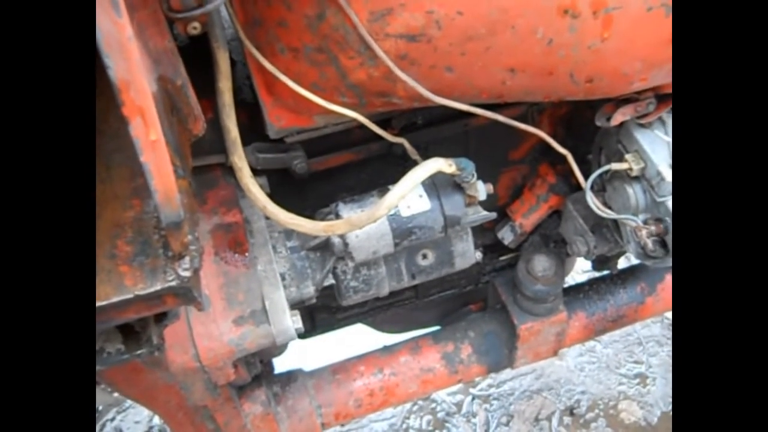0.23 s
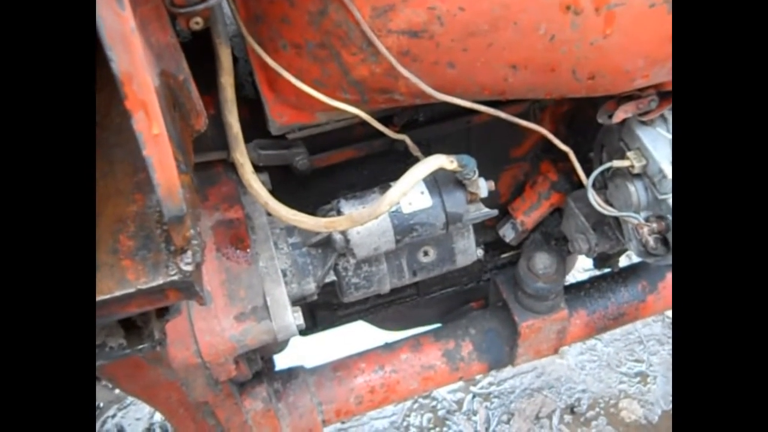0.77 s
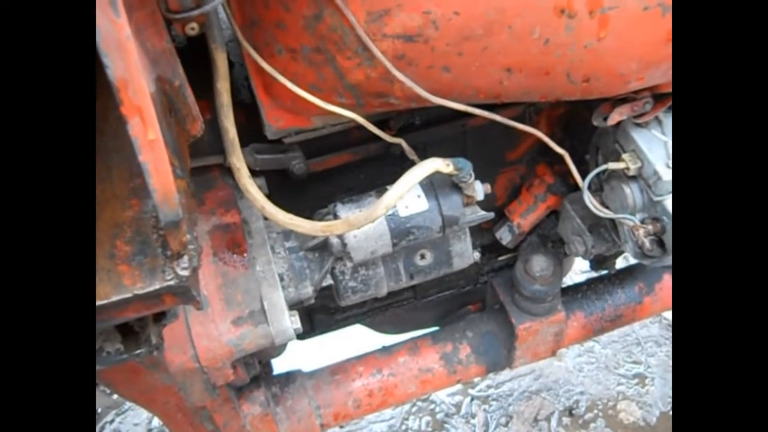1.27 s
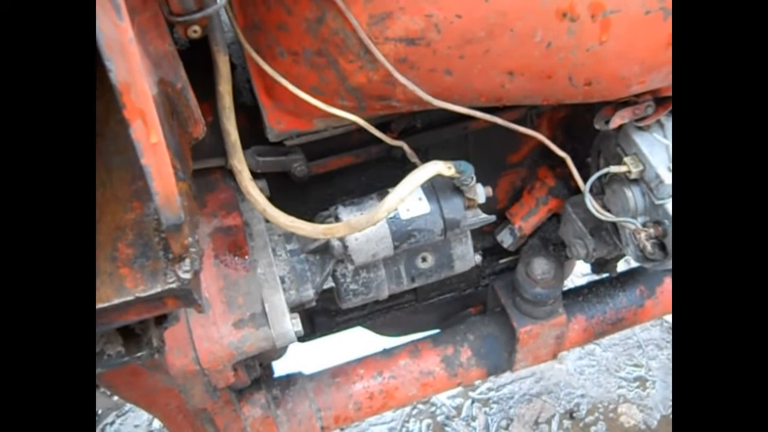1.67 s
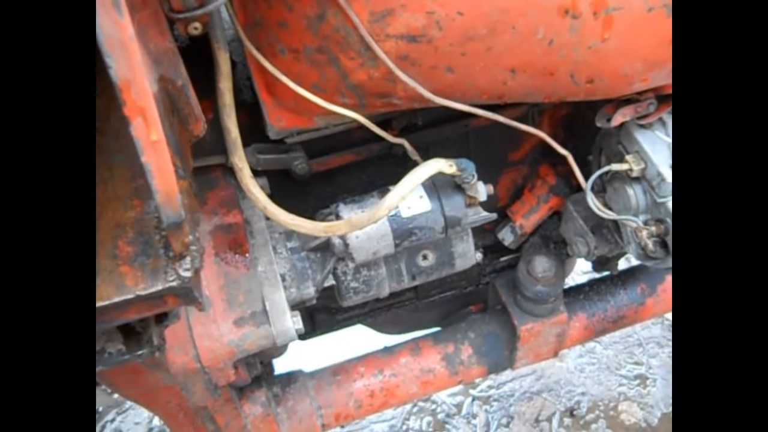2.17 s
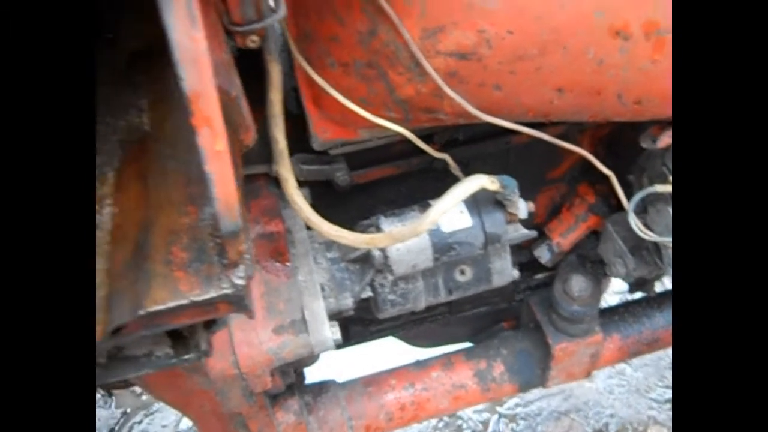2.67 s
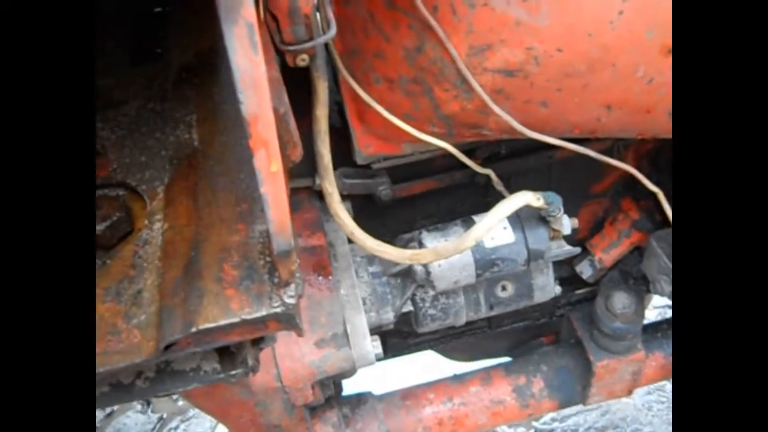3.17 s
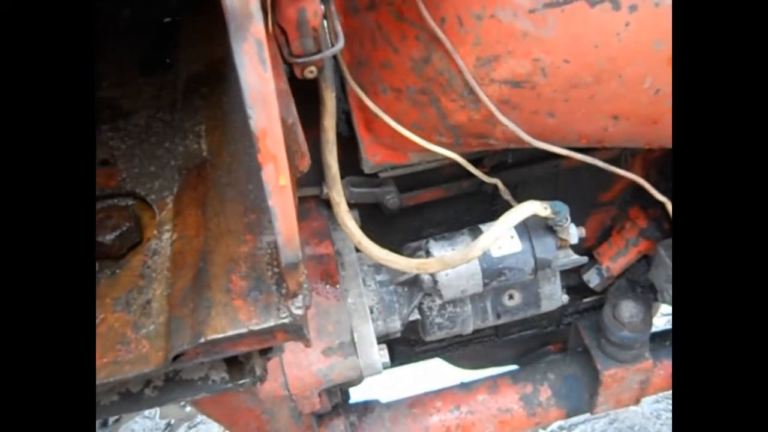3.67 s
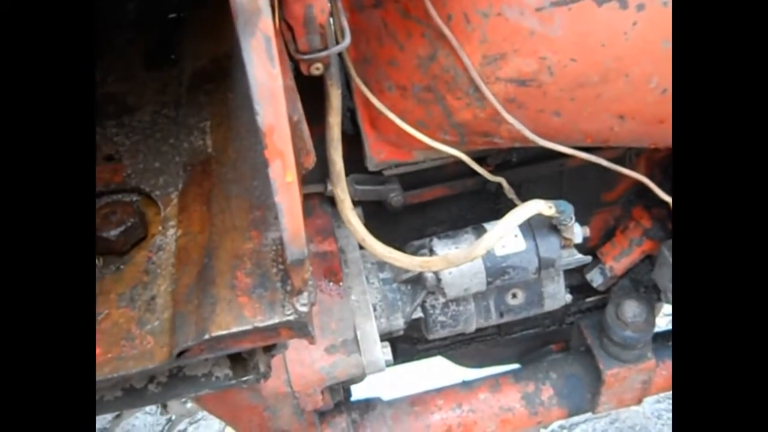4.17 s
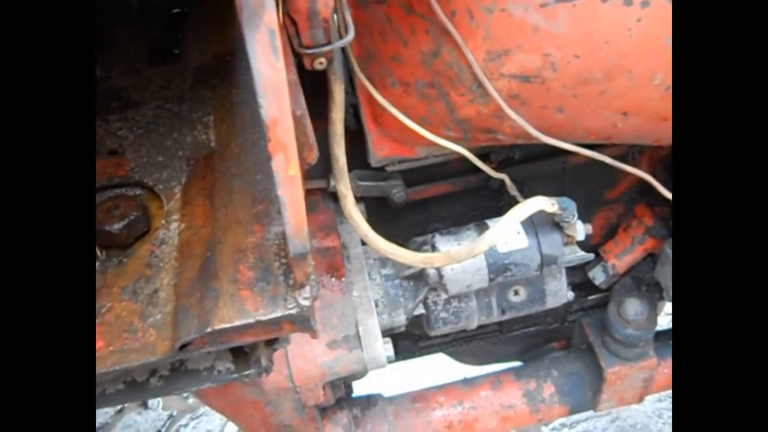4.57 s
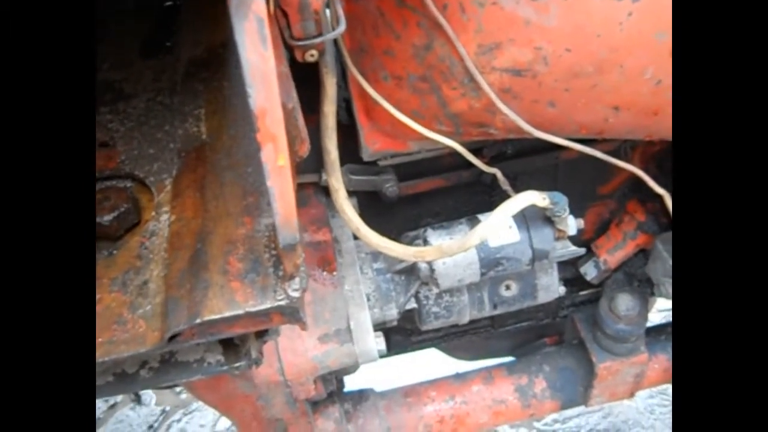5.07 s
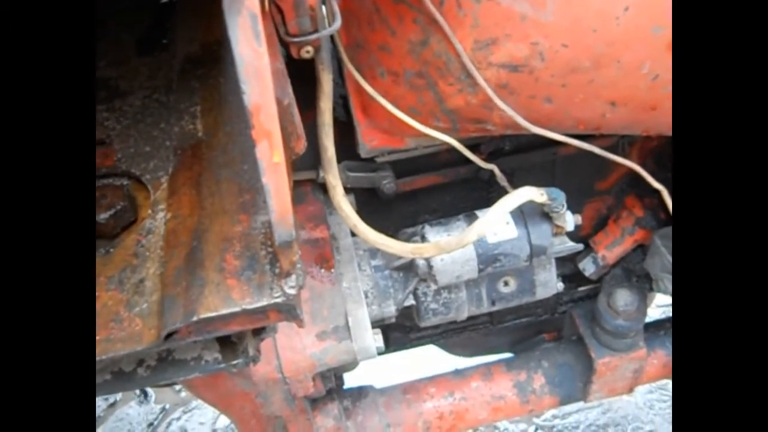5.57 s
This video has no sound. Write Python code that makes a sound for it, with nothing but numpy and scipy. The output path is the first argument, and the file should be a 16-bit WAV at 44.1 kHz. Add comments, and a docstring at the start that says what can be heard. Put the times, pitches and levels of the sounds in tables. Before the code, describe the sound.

Hard metal click-clacks from a tractor starter repeat over quiet outdoor air, growing louder, then low wind buffets hit the microphone.

```python
"""A starter solenoid on a tractor's cast housing pulls in and drops back every second or so, outdoors, near a
small camera. Each stroke is a chain of metal contacts ringing the housing's damped modes; a wall answers as
delayed decaying noise. Shaped noise makes the air hiss, a wandering sine the low early hum, damped tones the soft
knocks on the camera. Wind buffets the microphone as slow noise, thumps and flutter; the loudest peaks clip."""
import sys
import numpy as np
from scipy import signal
from scipy.fft import rfft, irfft, next_fast_len
from scipy.io import wavfile
from scipy.ndimage import map_coordinates

SR = 44100
rng = np.random.default_rng(int(sys.argv[2]) if len(sys.argv) > 2 else 0)


def generate_wav(sig):
    """Save sig (samples, or channels by samples) to the path in sys.argv[1] as 16-bit PCM at SR."""
    pcm = np.round(np.clip(np.atleast_2d(sig).T, -1, 1) * 32767).astype(np.int16)
    wavfile.write(sys.argv[1], SR, pcm)


N = 257103

# Rise and fall of the air hiss, which the steady wind rumble follows: time_s, rms_db
AIR_LEVEL = [(0, -51.5), (.38, -51), (.43, -53.5), (.6, -70), (1.2, -67.5), (1.45, -56.5), (1.86, -50.5),
             (1.9, -58), (2.3, -60.5), (3.6, -62.5), (3.8, -60), (4.06, -52), (4.1, -60.5), (5.1, -59.5),
             (5.2, -54), (5.58, -51.5), (5.65, -56), (5.83, -63)]


def amp(db):
    """Amplitude factor of a level in dB."""
    return 10 ** (np.asarray(db) / 20)


def unit(x):
    """x scaled to an rms of 1."""
    return x / np.sqrt(np.mean(x ** 2) + 1e-20)


def along(points, hz):
    """Values at hz from (Hz, value) points on a log frequency axis."""
    point_hz, values = np.transpose(points)
    return np.interp(np.log(hz + 1), np.log(point_hz + 1), values)


def curves(rows):
    """One value per sample for each column after the time."""
    time_s, *columns = np.transpose(rows)
    return [np.interp(np.arange(N) / SR, time_s, column) for column in columns]


def wobble(rate):
    """A smooth random curve, rate knots a second."""
    knots = rng.standard_normal(int(N * rate / SR) + 4)
    return map_coordinates(knots, [np.arange(N) * rate / SR])


def filtered(x, response):
    """x times a response of frequency, padded so that the end does not wrap round."""
    size = next_fast_len(N + SR // 2)
    spectrum = rfft(x, size) * response(np.fft.rfftfreq(size, 1 / SR))
    return irfft(spectrum, size)[..., :N]


def noise(spectrum):
    """Coloured noise of rms 1."""
    return unit(filtered(rng.standard_normal(N), lambda hz: amp(along(spectrum, hz))))


def air():
    """Smooth broad hiss of the surroundings: coloured noise on a level curve."""
    # Hiss colour: freq_hz, relative_db (per Hz)
    hiss = [(35, -20.5), (60, -19.5), (190, 1.5), (223, -1), (415, -3), (603, -4), (956, -6.5), (2980, -10),
            (3620, -11), (4170, -15), (5420, -41), (9170, -120)]
    return amp(curves(AIR_LEVEL)[0]) * noise(hiss)


def wind():
    """A buffeting rumble at the microphone port swells in gusts; single eddies thump and shed lumpy flutter."""
    # Rumble colour: freq_hz, relative_db (per Hz)
    buffet_colour = [(4, -14), (12, -2), (25, 0), (50, -8), (90, -13), (160, -23.5), (250, -120)]
    # Flutter colour: freq_hz, relative_db (per Hz)
    flutter_colour = [(50, -120), (80, -29), (130, 1.5), (250, -7.5), (500, -22), (800, -37), (1200, -120)]
    # Gusts: start_s, length_s, buffet_rms_db
    gusts = [(-.05, 0.41, -51), (1.016, .04, -55), (1.4, 0.43, -49.5), (1.506, 0.063, -48.5),
             (1.667, 0.047, -43), (2.2, .16, -48), (4.45, 0.24, -54.5), (4.694, 0.4, -41),
             (5.079, 0.49, -34.5), (5.72, 0.22, -37.5)]
    # Single eddies: start_s, level_db, rate_hz
    thumps = [(4.694, -27, 34.6), (4.778, -26, 53.8), (4.862, -26.5, 97), (4.919, -22.5, 79.6),
              (5.097, -21.5, 27), (5.137, -17.5, 29.4), (5.23, -11.5, 47), (5.278, -13, 75.8),
              (5.355, -15.5, 51.1), (5.398, -27, 29.6), (5.429, -41.5, 29.6), (5.501, -29, 37.4),
              (5.55, -28, 26.6), (5.72, -28.5, 51.1), (5.787, -39, 59.2)]
    rumble_db = 1  # steady rumble over the air hiss
    gust_edge_s = .02
    # small fast eddies shed more flutter; follows is the share of an eddy's dB that its flutter takes on
    flutter_db, flutter_ref_hz, flutter_db_per_oct, follows = -30.5, 49.4, 7, 0.56
    flutter_s = 0.029  # half-width of each flutter burst, to 1/e

    t = np.arange(N) / SR

    def step(s):
        return (1 + np.tanh((t - s) / gust_edge_s)) / 2

    buffet = unit(amp(2.2 * wobble(22)) * noise(buffet_colour))
    flutter = unit(amp(3 * wobble(60)) * noise(flutter_colour))
    level = amp(curves(AIR_LEVEL)[0] + rumble_db)
    for start_s, length_s, db in gusts:
        level = level + amp(db) * step(start_s) * (1 - step(start_s + length_s))
    out = level * buffet
    for start_s, db, hz in thumps:
        cycles = (t - start_s) * hz - .5  # from the middle of the eddy
        # pressure builds, then collapses sharply into suction
        thump = -amp(db - 4.5) * np.tanh(cycles * 9) * np.exp(-9 * cycles ** 2)
        shed_db = follows * db + flutter_db + flutter_db_per_oct * np.log2(hz / flutter_ref_hz)
        burst = np.exp(-(cycles / hz / flutter_s) ** 2)
        out += thump + amp(shed_db) * burst * flutter
    return out


def hum():
    """A low sine, unsteady in level and pitch, that has sunk almost away just after the second pull-in."""
    # Course of the hum: time_s, pitch_hz, rms_db
    course = [(0.4, 82, -74), (0.8, 80.5, -61), (1.1, 83.2, -69.5), (1.3, 85.5, -56.5), (1.65, 85, -48.5),
              (1.86, 84, -62), (1.9, 85.6, -87)]
    hz, db = curves(course)
    tone = np.sin(2 * np.pi * np.cumsum(hz) / SR)
    return np.sqrt(2) * amp(db + 0.88 * wobble(19)) * tone


def contacts():
    """Every metal contact of every stroke: (time s, level dB, brightness dB per octave)."""
    # Pull-in strokes: time_s, level_db
    pulls = [(.3867, -13.5), (1.8669, -13.5), (2.8804, -5), (4.072, -.8), (5.591, -5), (5.6146, -1.1)]
    # Drop-back strokes: time_s, level_db
    drops = [(.561, -20), (2.0173, -15), (3.0468, -12), (4.216, -11.5), (5.7482, -16.5)]
    # Switch ticks ahead of the hard pulls: time_s, level_db
    switch_ticks = [(2.8702, -29.5), (4.063, -26), (5.5752, -30)]
    # Pull-in chain of lever knock, blow, two rebounds: offset_ms, relative_db, brightness_db_per_octave
    pull_chain = [(-2.8, -15, -2.5), (0, 0, 2.5), (3.2, -7, 1), (7.6, -12, 0)]
    # Drop-back chain of switch tick, spring, lever knock, blow, rebound:
    # offset_ms, relative_db, brightness_db_per_octave
    drop_chain = [(-15, -19, -4.5), (-10.5, -9.5, 3), (-5, -7.5, -6), (0.5, 0.5, -1.5), (4, -11, -2)]
    tick_chain = [(0.0094, 0.004, -4)]  # one dull contact, same columns
    hits = []
    for strokes, chain in [(pulls, pull_chain), (drops, drop_chain), (switch_ticks, tick_chain)]:
        for s, db in strokes:
            for ms, relative_db, bright_db in chain:
                hits.append((s + ms / 1000, db + relative_db, bright_db))
    return hits


def solenoid():
    """Every contact snaps, then rings the same housing modes, tilted by how hard it is, under a rattle."""
    # Ringing modes of the cast starter housing: freq_hz, level_db, t60_s
    modes = [(173, -35.5, 0.31), (250, -19.5, 0.033), (321, -29.5, 0.18), (460, -15.5, 0.029),
             (553, -15, 0.061), (688, -11.5, 0.065), (776, -19.5, 0.15), (918, -16.5, 0.16),
             (1072, -16, 0.11), (1193, -18, 0.055), (1314, -26.5, 0.14), (1480, -21.5, 0.18),
             (1670, -20.5, .07), (1725, -9.5, 0.082), (1924, -5.5, 0.053), (2004, -9.5, 0.092),
             (2111.6, -6, 0.079), (2519, -10, 0.089), (2525.4, -1.5, 0.066), (2654, -13.5, 0.093),
             (2630, -13, .06), (3018, -3, 0.03), (3125, -6.5, 0.095), (3293, 0, 0.016), (3180, -22, 0.036),
             (3860, -27.5, 0.1), (3604, -16, 0.14), (3720, -9.5, 0.0066), (4212, -3.5, .04)]
    hz, level_db, t60 = np.transpose(modes)[:, :, None]
    out, t = np.zeros(N + SR), np.arange(SR // 2) / SR
    # bending waves carry low tones more slowly
    lag = .002 * (np.sqrt(4200 / hz) - 1)
    age = np.clip(t - lag, 0, None)
    fade = amp(level_db - 60 * age / t60) * (1 - np.exp(-age / 0.00052))
    snap = amp(12 - 60 * t / .017) * (1 - np.exp(-t / .0008)) * np.sin(2 * np.pi * 3180 * t)
    # dull contacts push the lever instead
    knock = amp(6 - 60 * t / 0.0052) * (1 - np.exp(-t / 0.00045)) * np.sin(2 * np.pi * 850 * t)
    rattle_fade = amp(-60 * t / .065) * (1 - np.exp(-t / .001))
    rattle_lowpass = signal.butter(6, 4000, fs=SR, output="sos")
    for s, peak_db, bright_db in contacts():
        # brightness tilts the modes about 3 kHz; each contact strikes them a little differently
        strength = amp(bright_db * np.log2(hz[:, 0] / 3000) + rng.normal(0, 1.7, len(hz)))
        # loose parts blur each mode, the high ones most: a random phase walk in steps of 90 samples
        walk = np.cumsum(rng.normal(0, .9, (len(hz), len(t) // 90)), axis=1)
        drift = walk.repeat(90, axis=1) * (hz / 2500) ** .3
        start_cycle = rng.random((len(hz), 1))
        rings = fade * np.sin(2 * np.pi * (hz * age + start_cycle) + drift)
        grit = np.diff(rng.standard_normal(len(t) + 1))
        rattle = amp(18.5) * rattle_fade * signal.sosfilt(rattle_lowpass, grit)
        sound = strength @ rings + amp(bright_db) * snap
        sound += amp(-2.2 * bright_db) * knock + amp(0.52 * bright_db) * rattle
        out[round(s * SR):][:len(t)] += amp(peak_db) * sound / np.abs(sound).max()
    # the small housing radiates no deep bass
    return signal.sosfilt(signal.butter(4, 140, "high", fs=SR, output="sos"), out[:N])


def wall(x):
    """A diffuse answer swells after the trip to the wall and back, each frequency dying at its own speed."""
    # Dying time of the answer: freq_hz, t60_s
    decay = [(200, 0.63), (1000, 0.27), (2500, 0.14), (4000, 0.13)]
    trip_s = .035  # there and back, a wall about 6 m off
    hz, t, grains = signal.stft(rng.standard_normal(SR // 2), SR, nperseg=256)
    swell = 1 - np.exp(-t / 0.033)
    fade = amp(-60 * t / along(decay, hz)[:, None])
    tail = signal.istft(grains * swell * fade, SR, nperseg=256)[1]
    delayed = np.pad(x, (round(trip_s * SR), 0))
    return signal.fftconvolve(delayed, tail / np.linalg.norm(tail))[:N]


def bumps():
    """Dull knocks on the camera: each one damped tone with a little shorter-lived noise."""
    # Soft knocks on the camera: start_s, level_db, pitch_hz, t60_s
    knocks = [(3.395, -46.5, 626, 0.037), (3.401, -47.5, 133, 0.2), (3.881, -36, 239, 0.019),
              (3.895, -43, 308, 0.023)]
    out, t = np.zeros(N + SR), np.arange(SR // 4) / SR
    for s, db, hz, t60 in knocks:
        envelope = amp(db - 60 * t / t60) * (1 - np.exp(-t / 0.00025))
        scuff = 0.51 * amp(-60 * t / 0.026) * rng.standard_normal(len(t))
        out[round(s * SR):][:len(t)] += envelope * (np.sin(2 * np.pi * hz * t) + scuff)
    return out[:N]


def scene():
    """Everything that reaches the microphone, in one channel."""
    clicks = solenoid()
    return (clicks + amp(-28.5) * wall(clicks) + bumps() + air() + hum() + wind())[None]


def record(dry):
    """A narrow-band channel clips the loudest peaks, which splashes treble up to the band limit."""
    # Response of the microphone channel: freq_hz, gain_db
    band = [(3700, 1), (4000, -10), (4300, -14.5), (4600, -40.5), (5000, -50.5), (5600, -65.5),
            (16000, -59.5)]
    ceiling, top_hz = .74, 15600
    x = filtered(dry, lambda hz: amp(along(band, hz)))
    x = x / (1 + np.abs(x / ceiling) ** 24) ** (1 / 24)
    x = x + amp(-99) * rng.standard_normal(x.shape)  # converter noise
    return filtered(x, lambda hz: 1 / (1 + (hz / top_hz) ** 200))


dry = scene()
out = record(dry)
generate_wav(out)
```